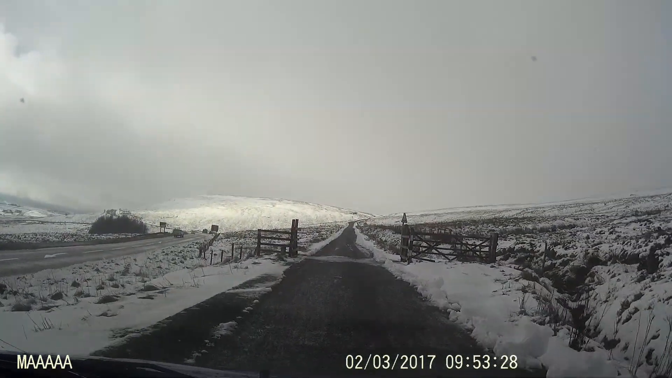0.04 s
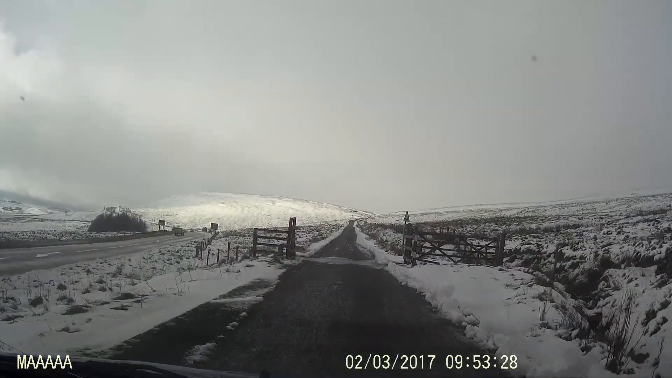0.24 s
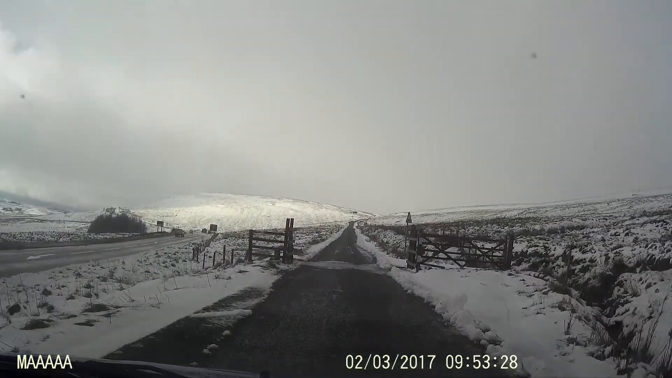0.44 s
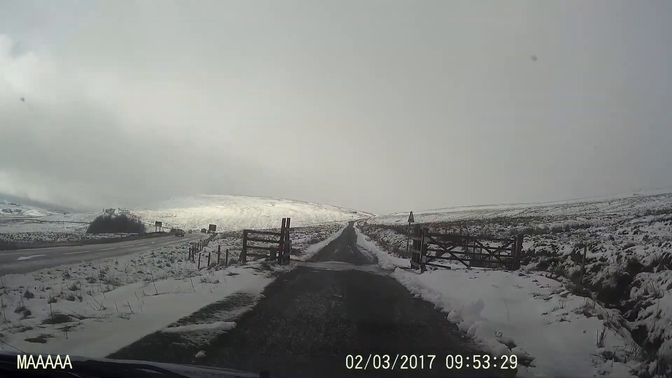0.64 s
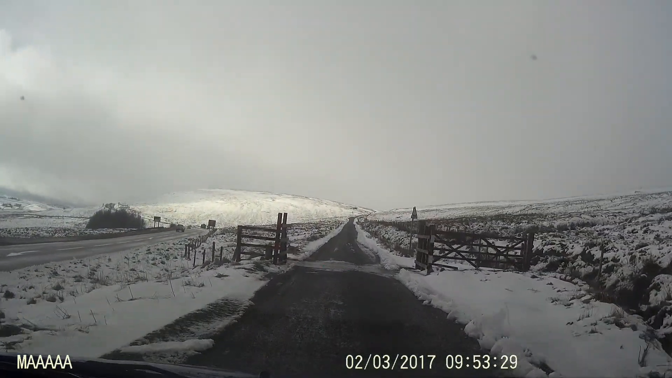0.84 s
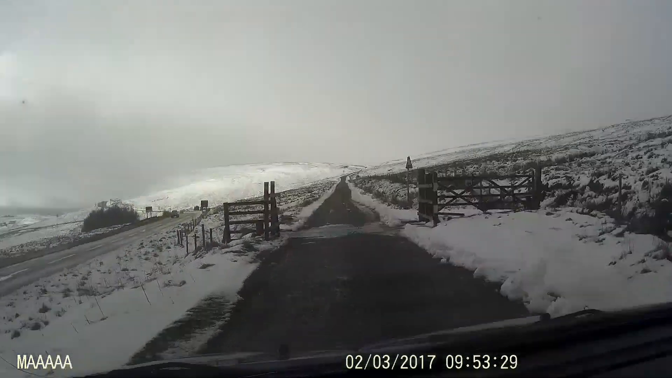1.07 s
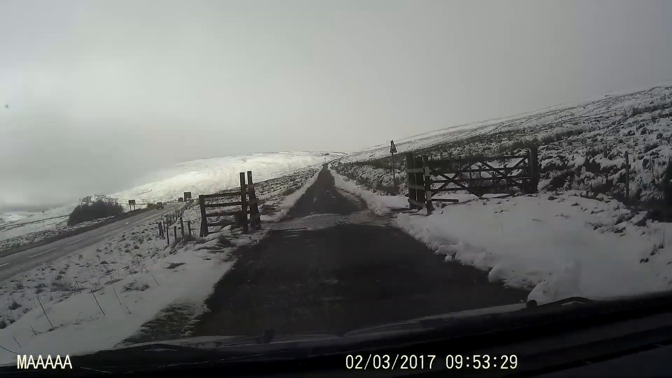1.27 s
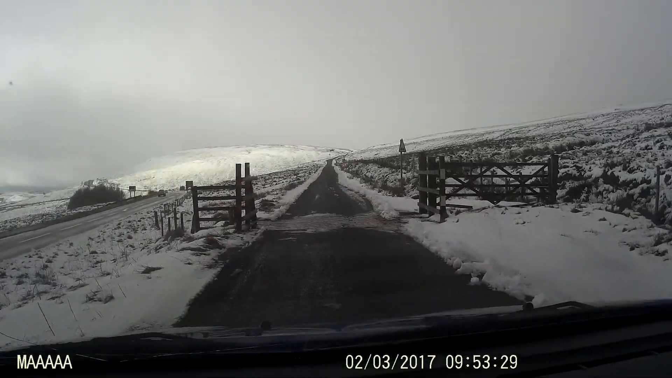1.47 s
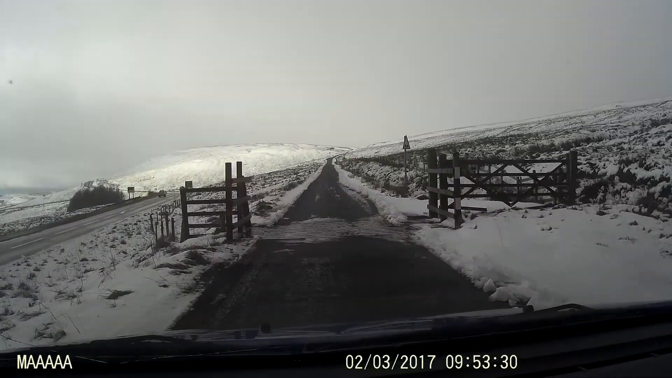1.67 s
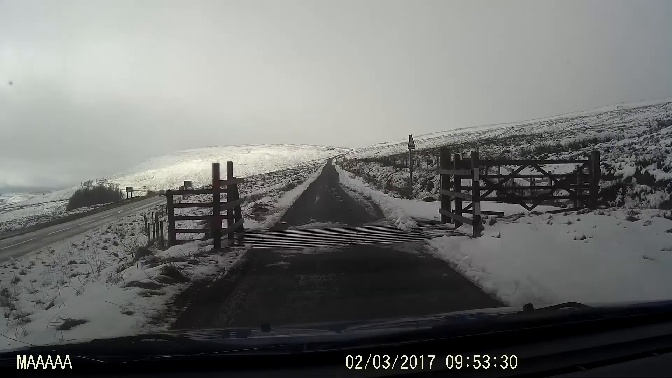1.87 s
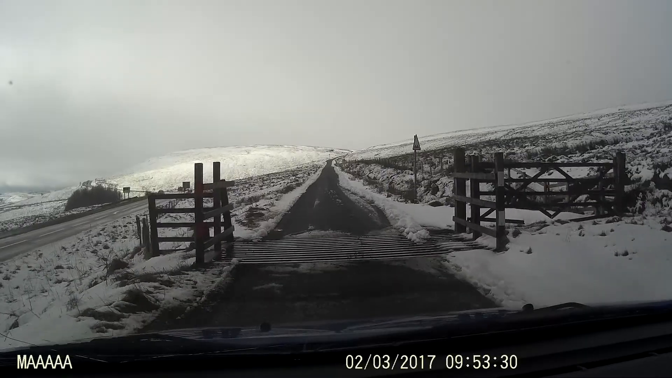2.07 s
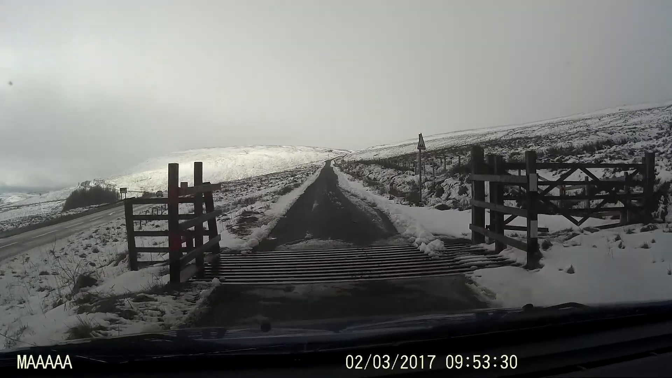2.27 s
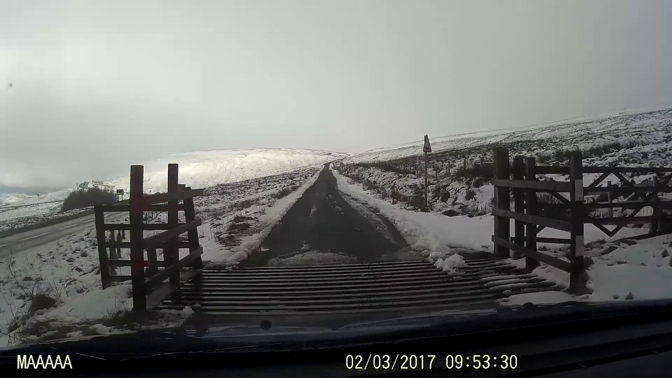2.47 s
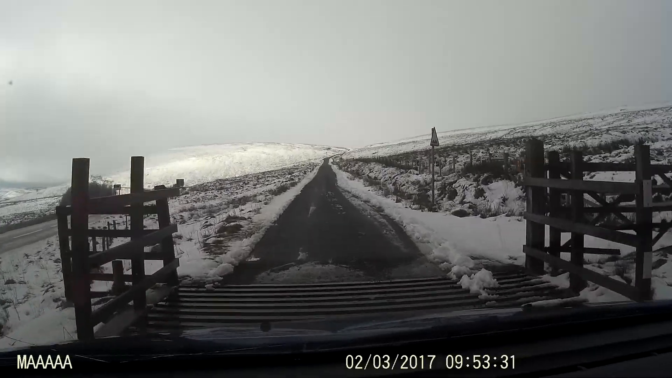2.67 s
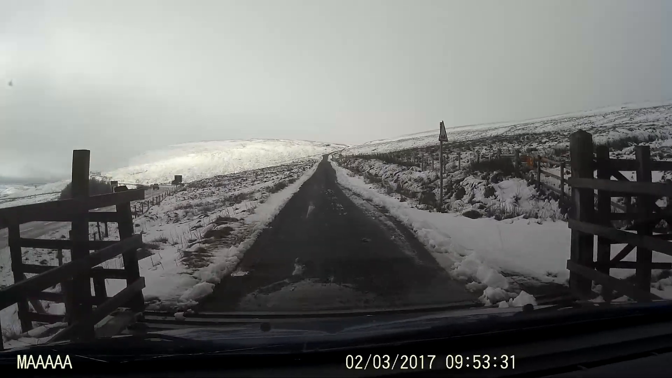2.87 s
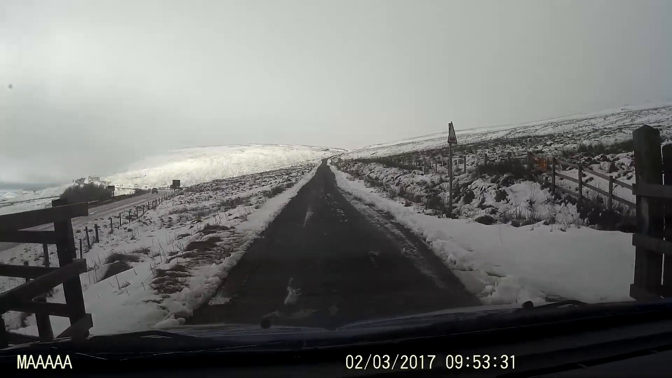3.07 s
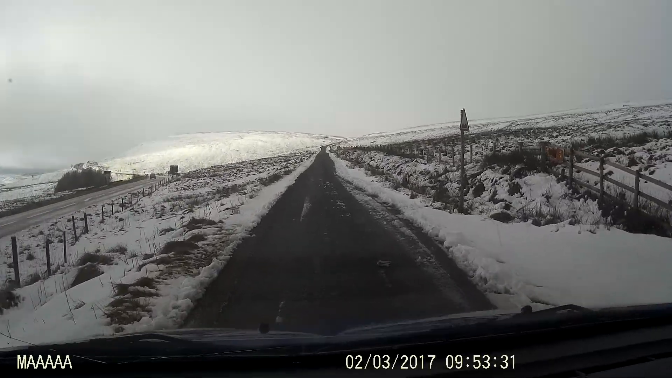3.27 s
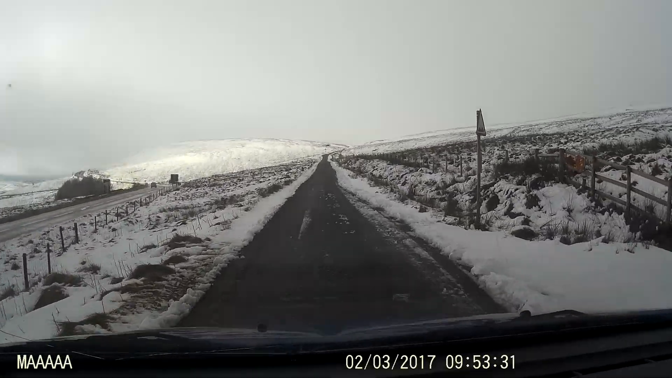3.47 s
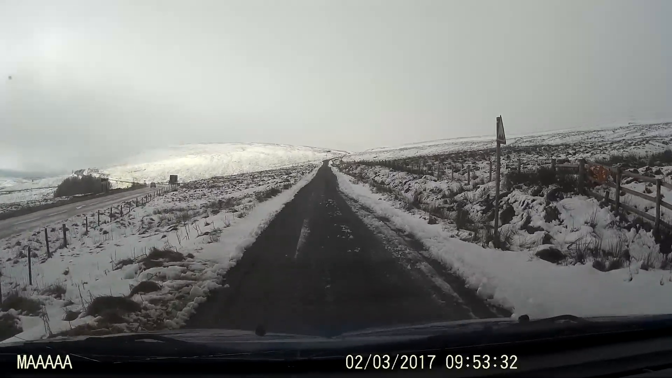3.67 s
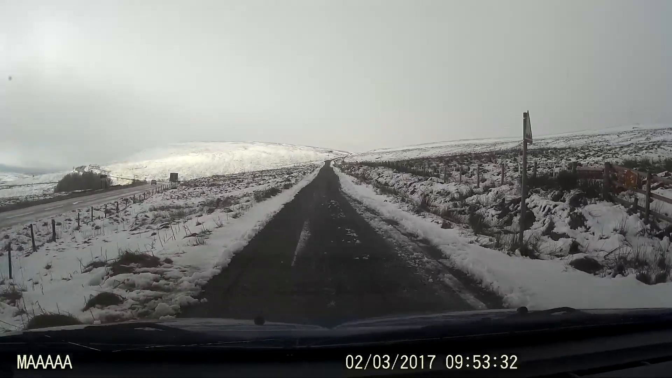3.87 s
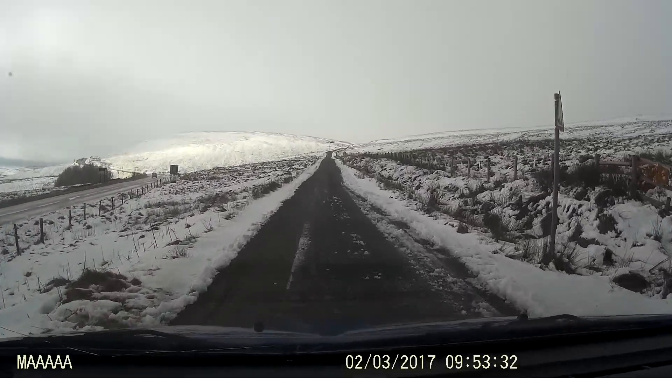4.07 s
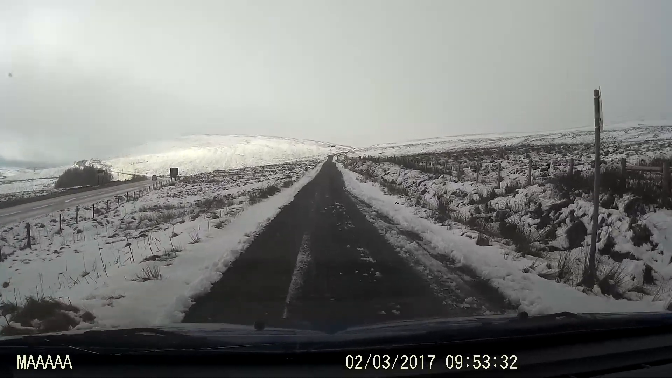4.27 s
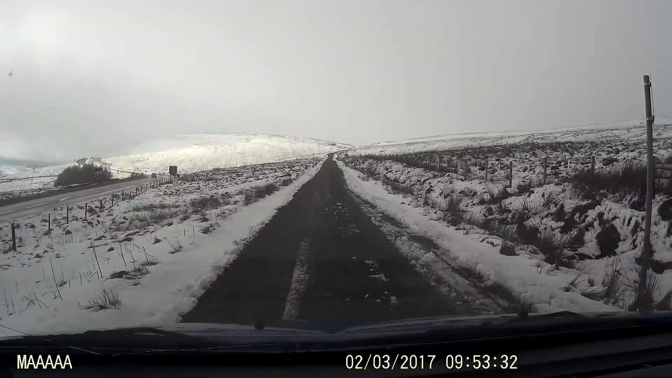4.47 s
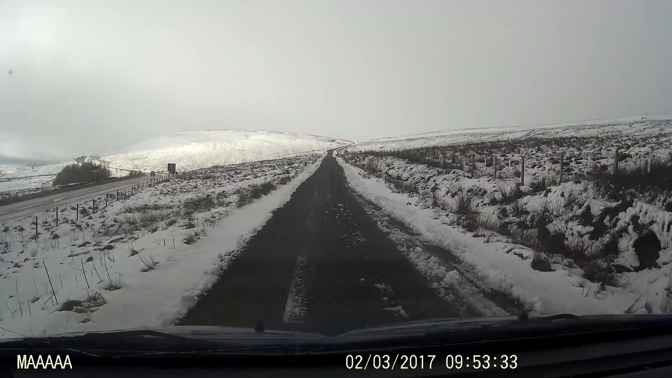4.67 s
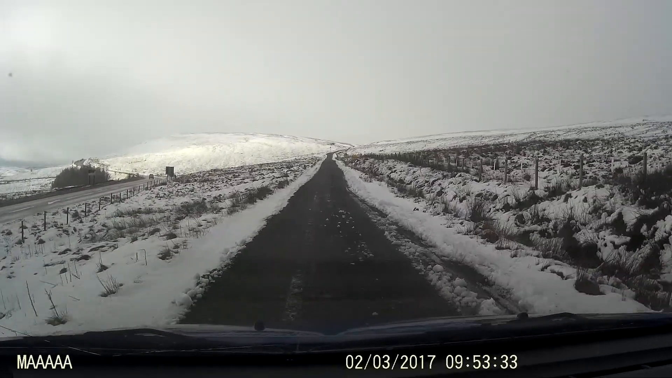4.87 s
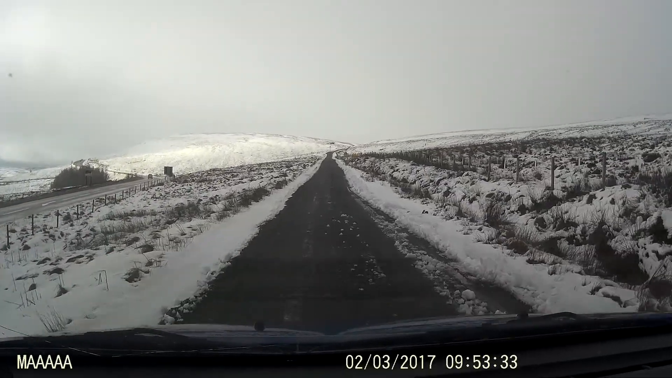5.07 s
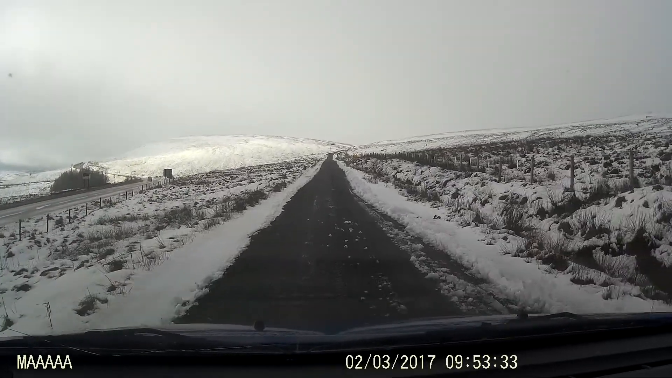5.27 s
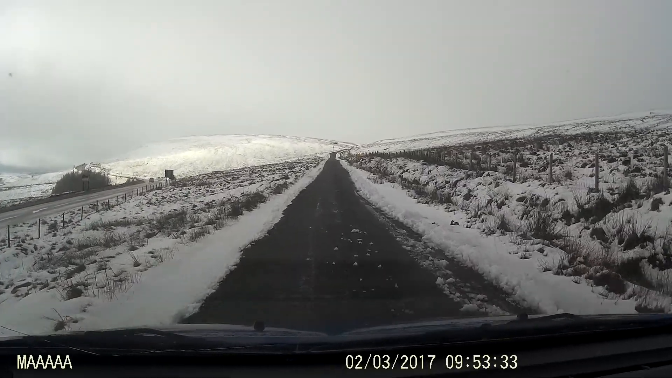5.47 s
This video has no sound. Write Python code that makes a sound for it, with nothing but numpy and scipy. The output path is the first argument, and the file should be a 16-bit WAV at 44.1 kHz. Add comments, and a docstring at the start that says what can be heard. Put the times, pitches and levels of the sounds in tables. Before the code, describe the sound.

Inside a moving car, low road rumble and plastic clicks from a handled camera mount, then a loud buzzing rattle over a cattle grid.

```python
"""Inside a car on a rough lane, heard by a camera on the windscreen over its own hiss and whine.
First, shaped noise gives rumble, boom and tyre roar, while a hand rubs the camera's plastic mount and clicks it,
each click a short burst through resonances. Then come faint gliding squeaks. From about 3 s two axles cross a
cattle grid: harmonics of a steady bar rate shake the body, gated noise and single raps rattle the trim.
After the grid the lane rumble goes on, with a few last rubs and knocks."""
import sys
import numpy as np
from scipy import signal
from scipy.fft import rfft, irfft, next_fast_len
from scipy.io import wavfile
from scipy.ndimage import uniform_filter1d

SR = 44100
rng = np.random.default_rng(int(sys.argv[2]) if len(sys.argv) > 2 else 0)


def store_pcm(level_fs):
    """Save levels as 16-bit WAV."""
    pcm = np.round(np.clip(level_fs, -1, 1) * 32767).astype(np.int16)
    wavfile.write(sys.argv[1], SR, np.atleast_2d(pcm).T)


N = 243431  # length in samples


def amp(db):
    """Gain of a level in dB."""
    return 10 ** (np.asarray(db) / 20)


def unit(x):
    """Scaled to rms 1."""
    return x / np.sqrt(np.mean(x ** 2) + 1e-20)


def curves(rows):
    """One value per sample for each column after the time, in straight lines between the rows."""
    s, *cols = np.transpose(rows)
    return [np.interp(np.arange(N) / SR, s, c) for c in cols]


def span(on, off, rise, fall, first_db, last_db):
    """Gain that rises from on, glides between two levels and falls away after off."""
    t = np.arange(N) / SR
    edge = np.clip(np.minimum((t - on) / rise, 1 + (off - t) / fall), 0, 1)
    return edge ** 2 * amp(np.interp(t, [on, off], [first_db, last_db]))


def filtered(x, response):
    """x times a complex response of frequency, padded so that the ringing does not wrap round."""
    m = next_fast_len(N + SR // 2)
    spectrum = rfft(x, m) * response(np.fft.rfftfreq(m, 1 / SR))
    return irfft(spectrum, m)[:N]


def noise(spectrum, patchy_db):
    """Coloured noise of rms 1 with patches of random gain over time and frequency."""
    z = signal.stft(rng.standard_normal(N), nperseg=512)[2]
    field = uniform_filter1d(rng.standard_normal(z.shape), size=6, axis=0)  # across frequency
    field = uniform_filter1d(field, size=10, axis=1)  # along time
    x = signal.istft(z * amp(patchy_db * unit(field)), nperseg=512)[1][:N]
    f, db = np.transpose(spectrum)
    return unit(filtered(x, lambda hz: amp(np.interp(np.log(hz + 1), np.log(f + 1), db))))


def modes(table):
    """Causal response of a set of resonances passed twice for steep skirts, with energy 1 for white noise."""
    def response(f):
        once = 0
        for k, (centre, width, db) in enumerate(table):
            resonance = 1j * f * width / (centre * centre - f * f + 1j * f * width)
            once = once + (-1) ** k * amp(db) * resonance  # neighbours in opposite phase
        return once ** 2 / np.sqrt(np.mean(abs(once) ** 4))
    return response


def resonant(hz, width_hz, even):
    """Noise ringing in one resonance; even (0-1) turns its swells of level into a wavering of pitch alone."""
    ringing = filtered(rng.standard_normal(N), modes([(hz, width_hz, 0)]))
    z = signal.hilbert(ringing, next_fast_len(N))[:N]
    steady = (z / (abs(z) + 0.072 * np.std(z)) ** np.clip(even, 0, 1)).real
    return unit(filtered(steady, modes([(hz, 4.0 * width_hz, 0)])))


# microphone noise: f/Hz, relative level/dB per Hz
HISS_SPECTRUM = [(1180, -15), (2000, -4), (2670, -6), (5160, -8.5), (5590, -7.5), (7530, -10.5),
                 (8150, -7.5), (13900, -11), (15700, -13), (16300, -20.5)]
# whine of the electronics: f/Hz, rms level/dB
WHINE_TONES = [(7903, -88.5)]


def microphone():
    """The microphone's own patchy hiss and the steady sine whine of the electronics."""
    t = np.arange(N) / SR
    whine = sum(amp(db) * np.sqrt(2) * np.sin(2 * np.pi * hz * t) for hz, db in WHINE_TONES)
    return amp(-75) * noise(HISS_SPECTRUM, patchy_db=1.5) + whine


# an axle on the bars, levels before wheel hop: t/s on, t/s off, shake at the bar rate level/dB,
# at twice the rate level/dB, higher orders level/dB, tyre drone level/dB, tyre roar level/dB,
# rattle at first level/dB, rattle at last level/dB, full depth of wheel hop/dB,
# lane rumble left/dB (only cuts below 0 count)
AXLE_PASSES = [(3.036, 3.48, -40, -43.5, -51.5, -46.5, -52.5, -63, -52.5, 1, 2),
               (3.463, 3.894, -36.5, -27, -43, -60, -49, -48, -42, .3, -8)]
ON_S, OFF_S = 0.094, 0.082  # rolling on and off
HOP_S, HOP_CREST_S = 0.1045, 3.19  # period and one crest of the wheel hop


def axles():
    """Gains of the five grid layers and of the rattle, swaying with wheel hop, and the gain left to the lane."""
    gains, lane_db = np.zeros((6, N)), np.zeros(N)
    hop = np.cos(2 * np.pi * (np.arange(N) / SR - HOP_CREST_S) / HOP_S)
    hop_share = np.c_[[.3, 1, .3, .3, .3]]  # twice the bar rate takes the full depth
    for on, off, *db, first_db, last_db, hop_db, left_db in AXLE_PASSES:
        over = span(on, off, ON_S, OFF_S, 0, 0)
        gains[:5] += over * amp(db)[:, None] * amp(hop_db * hop * hop_share)
        gains[5] += span(on, off, ON_S, OFF_S, first_db, last_db) * amp(0.6 * hop_db * hop)
        lane_db = np.minimum(lane_db, over * left_db)
    return gains, amp(lane_db)


# the lane before and after the grid, before any cut on the grid:
# t/s, sway of the body on its springs level/dB, cabin boom level/dB
LANE = [
    [(0.0, -58, -54), (0.05, -42, -52.5), (0.41, -51, -53.5), (0.83, -47.5, -49.5), (0.87, -69, -49),
     (1.02, -45.5, -46.5), (2.27, -53, -47.5), (2.35, -45.5, -60.5), (2.62, -53.5, -40.5), (3.04, -45, -54)],
    [(3.98, -45, -42), (4.214, -51, -46), (4.836, -51.5, -43.5), (4.888, -59, -57), (4.934, -71, -42),
     (5.012, -46, -46), (5.152, -48, -37.5), (5.196, -56, -48), (5.466, -49, -43.5), (5.52, -71, -42)],
]
# tyre drone: f/Hz, relative level/dB per Hz
DRONE_SPECTRUM = [(45, -3), (76, -3), (84, 1), (86, -9), (129, -2), (154, -5), (188, -9), (205, -34),
                  (230, -15), (300, -60), (510, -120)]
# tyre roar: f/Hz, relative level/dB per Hz
ROAR_SPECTRUM = [(120, -8), (200, -6.5), (265, 0), (357, -5.5), (542, -8), (941, -16.5), (1060, -15),
                 (1730, -21), (2000, -28), (2450, -26.5), (3000, -28), (5000, -46.5), (6500, -77),
                 (11000, -120)]
DRONE_DB, ROAR_DB = -51.5, -58.5  # tyres on the lane


def road():
    """The rough surface drives the springs, the cabin air and the tyres; the grid adds its own drone and roar."""
    sway_db, boom_db = curves(LANE[0] + LANE[1])
    (*_, grid_drone, grid_roar, _), lane_left = axles()
    sway = amp(sway_db) * resonant(hz=27.3, width_hz=14.0, even=1.0)
    boom = amp(boom_db) * resonant(hz=56.0, width_hz=21.2, even=0.43)
    # hypot adds the powers of lane and grid
    drone = np.hypot(amp(DRONE_DB), grid_drone) * noise(DRONE_SPECTRUM, patchy_db=-0.5)
    roar = np.hypot(amp(ROAR_DB), grid_roar) * noise(ROAR_SPECTRUM, patchy_db=0.5)
    return lane_left * (sway + boom) + drone + roar


# skin and cloth: f/Hz, relative level/dB per Hz
SKIN_SPECTRUM = [(710, -47), (1200, -14), (1700, -7), (2400, -5.5), (3000, -12), (3350, -9.5), (4960, -8.5),
                 (6960, -10.5), (11400, -12), (14100, -13), (16300, -30)]
# strokes of hand and cloth near the microphone: t/s, length/s, level at the start/dB, level at the end/dB
HAND_STROKES = [(.05, 0.15, -77, -81), (.465, 0.024, -46, -71), (.59, 0.12, -73, -80),
                (.98, 0.076, -55.5, -57), (1.06, 0.1, -69, -64), (1.16, 0.033, -74, -73),
                (1.19, 0.052, -63, -69.5), (1.385, 0.089, -63.5, -81), (1.74, 0.21, -79, -80),
                (1.98, 0.27, -74, -85), (2.6, 0.078, -73, -71.5), (4.12, 0.081, -75, -70),
                (4.385, 0.031, -67, -76), (4.8, 0.56, -85, -75.5)]
# the finger sliding on the mount excites its clack resonance:
# t/s, length/s, level at the start/dB, level at the end/dB
FINGER_SLIDES = [(1.0, 0.055, -79, -67), (1.065, 0.064, -77, -58.5), (1.16, 0.073, -82, -75),
                 (1.39, 0.064, -67, -80)]
STROKE_RISE_S, STROKE_FALL_S = .012, 0.0088


def strokes(rows):
    """Summed gain of strokes that fade in, glide in level and fade out."""
    return sum(span(s, s + length, STROKE_RISE_S, STROKE_FALL_S, first_db, last_db)
               for s, length, first_db, last_db in rows)


def rubbing():
    """Friction of skin and cloth near the microphone is patchy noise; the sliding finger rings the mount."""
    cloth_at_rest = amp(-78)
    rub = (strokes(HAND_STROKES) + cloth_at_rest) * noise(SKIN_SPECTRUM, patchy_db=2.5)
    slide = strokes(FINGER_SLIDES) * resonant(hz=2500, width_hz=300, even=0)
    return rub + slide


# faint squeaks: t/s, length/s, f/Hz at the start, level/dB before a lift of 9 dB and the swell
SQUEAK_TONES = [(1.7, .04, 2740, -70), (2.678, .035, 8550, -75), (2.735, .108, 3545, -66),
                (2.848, .034, 2770, -75)]


def squeaks():
    """Thin, slightly unsteady tones that swell late, rise a little in pitch and stop."""
    t, out = np.arange(N) / SR, np.zeros(N)
    flutter = amp(1.9 * unit(uniform_filter1d(rng.standard_normal(N), size=250)))
    for s, length, hz, db in SQUEAK_TONES:
        u = np.clip((t - s) / length, 0, 1)  # progress through the squeak
        swell = np.sin(np.pi * u ** .8) ** .6 * amp(18 * (u - 1))
        tone = np.sin(2 * np.pi * hz * length * (u + 0.0037 * u ** 3))
        out += amp(db + 9.0) * swell * flutter * tone
    return out


# clicks and knocks of hand and mount: t/s, level/dB before a lift of 4.5 dB, centre of colour f/Hz,
# loss an octave away from the centre/dB, thud over the level/dB, bright over the level/dB, t60/s
CLICKS = [(.111, -53.5, 2470, 14, -8, -15, 0.039), (.127, -48.5, 3760, 2.3, -5, -9, 0.011),
          (0.16, -57.5, 3300, 4.6, -7, -6, 0.028), (.202, -48.5, 3600, 4.2, -21, -13, 0.012),
          (.43, -63, 3600, 14, -20, -25, 0.012), (0.462, -43, 1760, 10.5, -17, -27, 0.052),
          (0.467, -38.5, 2300, 1.9, -3.5, -22, .031), (0.475, -36, 1300, 8.5, -14, -27, 0.021),
          (.481, -45, 1400, 7.5, -6, -25, 0.03), (0.501, -56, 2000, 5, -10, -25, 0.016),
          (0.493, -50, 2200, 3.2, -11, -25, 0.05), (.53, -55, 3600, 6.5, -12, -23, 0.014),
          (.611, -56.5, 2300, 2.6, -5, -22, 0.035), (.821, -39, 1450, 12, -14, -25, 0.012),
          (0.838, -51, 1450, 16, -15, -30, 0.0074), (.935, -55, 1450, 21, -13, -30, 0.0089),
          (.981, -46, 1910, 10, -20, -5, 0.015), (.993, -37.5, 3600, 7, -18, 1, 0.011),
          (.997, -41, 1400, 4.7, -6, -16, 0.011), (1.04, -30, 1450, 15, -10.5, -16, 0.0052),
          (1.0465, -38.5, 1900, 5.5, -11, -10, 0.013), (1.0536, -37, 1600, 2.5, -20, -13, 0.007),
          (1.0605, -16.5, 2460, 21, -40, -12, 0.011), (1.155, -20, 2390, 8.4, -11.5, -9.5, 0.01),
          (1.19, -52, 2000, 4, -7, -2, 0.02), (1.294, -47.5, 1300, 13, -18, -28, 0.014),
          (1.578, -62, 2800, 6, -2, -12, 0.021), (1.672, -58.5, 2800, 4, -10, -14, 0.02),
          (1.858, -58, 1590, 7, -2, -19, 0.049), (1.917, -55.5, 2340, 8.2, -16, -22, 0.058),
          (2.617, -62, 1200, 4, 4, -12, 0.053), (2.65, -56, 1430, 3.5, 0, -14, 0.018),
          (3.223, -42, 2600, 5, 2, 13.5, 0.012), (3.168, -49.5, 900, 8.8, 6, -27, 0.026),
          (3.489, -48, 900, 14, 8.5, -25, 0.03), (4.018, -46, 3800, 6.8, -10.5, -21, .012),
          (4.032, -50.5, 945, 10, -19, -15, 0.03), (4.036, -55, 2400, 10, -18, -21, 0.016),
          (4.085, -62, 3000, 6, -9, -3, .024), (4.095, -60, 2800, 6, -9, -12, 0.018),
          (4.15, -60, 2200, 6, 5, -15, .018), (4.1798, -41.5, 900, 5.5, 4.5, -18, 0.052),
          (4.219, -64, 2580, 5, -1, -12, .018), (4.495, -56.5, 1500, 12, -14, -20, 0.033),
          (5.292, -56.5, 2070, 10, 0, -14, 0.02), (5.346, -56.5, 2770, 8, -7, -21, 0.016)]
# the four middle colours: f/Hz
MIDDLE_HZ = [900, 1500, 2300, 3700]


def click_rows():
    """Hand clicks as (s, dB, six colours dB, t60 s): the middle colours fade away from each click's centre."""
    rows = []
    for s, db, hz, skirt_db, thud_db, bright_db, t60 in CLICKS:
        middle_db = -skirt_db * abs(np.log2(np.divide(MIDDLE_HZ, hz)))
        rows.append((s, db, thud_db, *middle_db, bright_db, t60))
    return rows


# the loudest raps of the trim on the grid: t/s, level/dB before a lift of 4.5 dB,
# bright over the level/dB, tilt/dB a colour upwards
TRIM_RAPS = [(2.9786, -48.5, -13, 2.8), (3.002, -39.5, -22, 1.2), (3.0137, -44.5, -22, 0.7),
             (3.0715, -38, -26, -0.2), (3.0809, -40, -22, 1.5), (3.1203, -40.5, -23, 2.5),
             (3.131, -41.5, -24, 0.3), (3.1446, -34, -26, -0.7), (3.1612, -35, -26, -2.2),
             (3.1979, -36.5, -23, -0.2), (3.2354, -33.5, -18, -1), (3.251, -44, -15, 4.5),
             (3.265, -39, -18, 1.5), (3.2703, -34.5, -17, -1), (3.3082, -43, -14, 5), (3.3412, -54, -4, -3),
             (3.3753, -38.5, -19, 2.9), (3.4096, -31, -21, -1.2), (3.4385, -32.5, -23, -0.7),
             (3.445, -35.5, -22, 0.3), (3.4733, -32.5, -27, -1), (3.4869, -34.5, -22, -3),
             (3.4978, -38.5, -14, -1), (3.5202, -41.5, -11, 5.4), (3.5516, -39, -22, 1.5),
             (3.5653, -34, -12, 1.8), (3.6016, -41, -2.5, 0.3), (3.6368, -41, -12.5, 1.7),
             (3.6643, -29.5, -6, 0), (3.6723, -32.5, -11, -1.5), (3.6773, -23, -17, 0.1),
             (3.698, -29, -16, 1), (3.7154, -24, -22, -1.3), (3.7331, -34, -25, 0), (3.7434, -42, -21, 0.3),
             (3.7509, -27, -20, -2), (3.7694, -40, -20, 4), (3.7825, -28, -21, -2.2), (3.8019, -33, -22, 0),
             (3.8106, -34, -20, 1), (3.837, -33.5, -27, -2), (3.8427, -40, -4, 4), (3.8588, -38, -30, -6),
             (3.8775, -34.5, -8, 1.8), (3.8955, -38, -31, -3), (3.917, -39, -20, 4),
             (3.933, -32.5, -36, -1.5)]


def rap_rows():
    """Trim raps as (s, dB, six colours dB, t60 s): they lean and scatter round one mix."""
    mix_db = [-15, -13, -11, -12, -12.5]  # thud to snap, over the level
    scatter_db = 2 * rng.standard_normal((len(TRIM_RAPS), 5))
    rows = []
    for (s, db, bright_db, tilt_db), more_db in zip(TRIM_RAPS, scatter_db):
        colours_db = mix_db + more_db + tilt_db * np.arange(-2, 3)
        rows.append((s, db, *colours_db, bright_db, 0.015))
    return rows


# resonances of mount and dashboard, one group for each colour from thud to bright:
# f/Hz, width/Hz of one pass, relative level/dB of one pass
BODY_MODES = [
    [(425, 290, -0.5), (586, 346, 0.5)],
    [(796, 840, 1.5), (1098, 360, 4.5)],
    [(1300, 290, 2), (1710, 220, -1.5)],
    [(1806, 990, -5.5), (2632, 680, 0)],
    [(3287, 420, 0.5), (4440, 460, -2), (5320, 1300, -6)],
    [(6620, 4200, 6.5), (8220, 1600, 13), (8700, 1050, 12), (11000, 1500, 9), (12360, 1800, 9),
     (14600, 1600, 6)],
]
# how long each colour is driven, as a share of the contact's t60
DRIVE_SHARE = [1.17, 0.78, 0.84, 0.78, 0.85, 0.51]


def contacts():
    """Each click or rap is a blow and a short dying scrape that ring the resonances in their own mix."""
    t, out = np.arange(SR // 10) / SR, np.zeros(N + SR)
    impulse = np.arange(N) == 0
    rings = np.array([filtered(impulse, modes(group))[:len(t)] for group in BODY_MODES])
    for s, db, *mix_db, t60 in click_rows() + rap_rows():
        t60 = np.clip(t60, .003, .1)
        decay = amp(-60 * t / (t60 * np.array(DRIVE_SHARE))[:, None])
        shape = decay * (1 - np.exp(-t / (0.038 * t60)))  # long ones swell
        burst = shape * rng.standard_normal(len(t))
        burst[:, 14] += 0.06 / t60  # the blow rules in short contacts
        rung = signal.fftconvolve(burst, rings, axes=1)
        # each colour keeps the energy of its drive
        rung *= np.sqrt(np.sum(shape ** 2, axis=1) / np.sum(rung ** 2, axis=1))[:, None]
        out[round(s * SR):][:rung.shape[1]] += amp(db + 4.5 + np.array(mix_db)) @ rung
    return out[:N]


def cabin(x, t60):
    """The small padded cabin answers with a short, dull tail of decaying noise."""
    t = np.arange(SR // 8) / SR
    dull = uniform_filter1d(rng.standard_normal(len(t)), size=4)
    tail = dull * amp(-60 * t / t60) * (t > .002)
    return signal.fftconvolve(x, tail / np.linalg.norm(tail))[:N]


# higher orders of the shake: multiple of the bar rate, relative level/dB
HIGHER_ORDERS = [(3, -0.5), (4, 6.5), (5, -5.5), (6, -1.5), (8, -23)]
# loose trim: f/Hz, relative level/dB per Hz
TRIM_SPECTRUM = [(88, 1), (150, 2), (349, -2.5), (450, 3), (986, -6.5), (1320, -4.5), (2040, -11),
                 (3390, -13.5), (3820, -21), (5430, -19.5), (6230, -34.5), (7440, -24.5), (9980, -30.5),
                 (12900, -34), (16300, -49)]
BAR_HZ, BAR_S = 28.57, 4  # bars a second, moment of zero phase in s


def grid():
    """Evenly spaced bars shake the body in harmonics of their rate; the trim noise surges once a bar."""
    (one, two, higher, _, _, rattle), _ = axles()
    turn = 2 * np.pi * BAR_HZ * (np.arange(N) / SR - BAR_S)
    orders = unit(sum(amp(db) * np.cos(k * turn + rng.uniform(0, 2 * np.pi)) for k, db in HIGHER_ORDERS))
    shake = np.sqrt(2) * (one * np.cos(turn + 0.2) + two * np.cos(2 * turn)) + higher * orders
    gate = amp(3.5 * np.cos(turn - 3.6) + 1 * np.cos(2 * turn - 2.5))
    # fast random gain makes the rattle grainy
    grains = amp(4.6 * uniform_filter1d(rng.standard_normal(N), size=60) * np.sqrt(60))
    return shake + rattle * unit(gate * grains * noise(TRIM_SPECTRUM, patchy_db=1.5))


def scene():
    """Everything in the cabin, one channel; only clicks and raps get the cabin tail."""
    near = contacts()
    near = near + amp(-28) * cabin(near, t60=.06)
    return (microphone() + road() + rubbing() + squeaks() + near + grid())[None]


def record(dry):
    """The camera keeps nothing above its band limit of 16.5 kHz."""
    return filtered(dry[0], lambda hz: hz < 16500)[None]


dry = scene()
out = record(dry)
store_pcm(out)
```